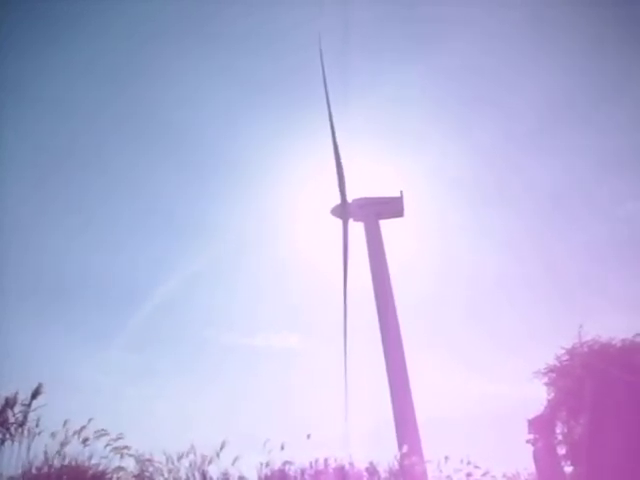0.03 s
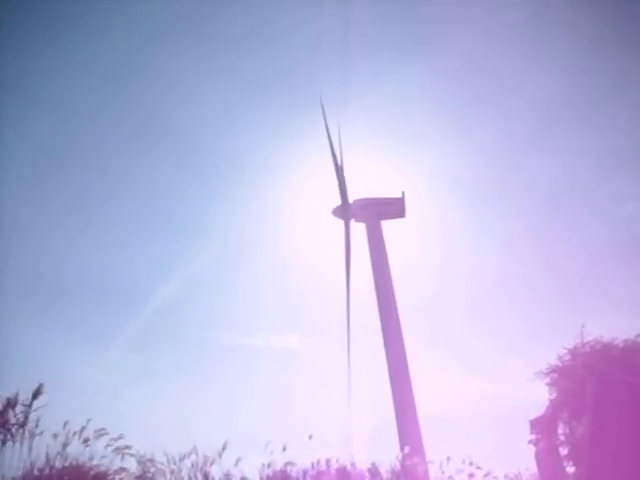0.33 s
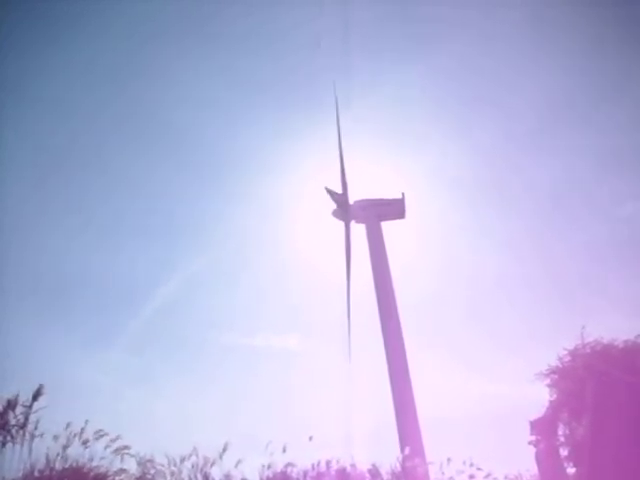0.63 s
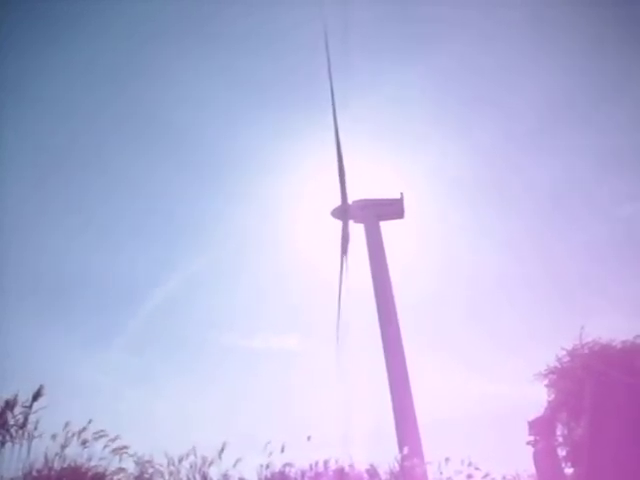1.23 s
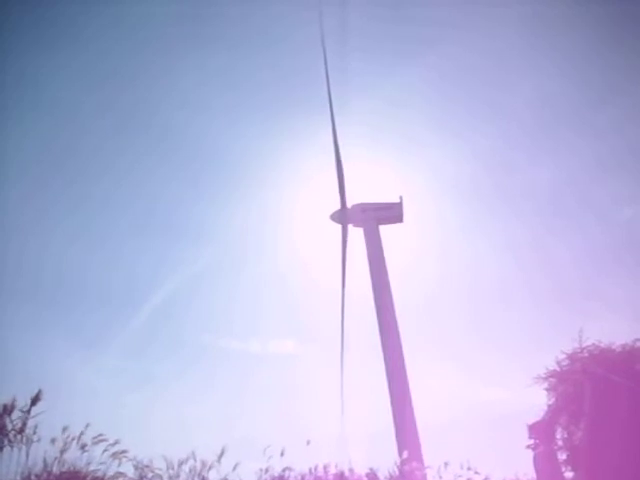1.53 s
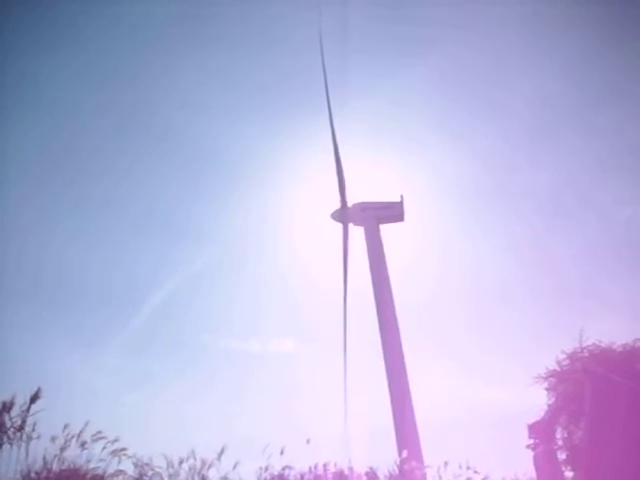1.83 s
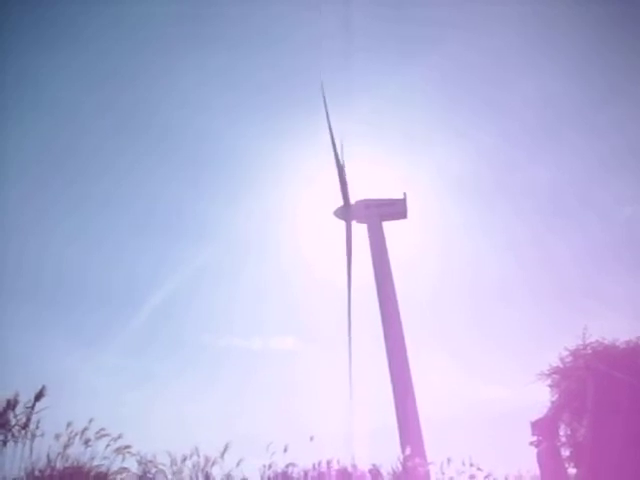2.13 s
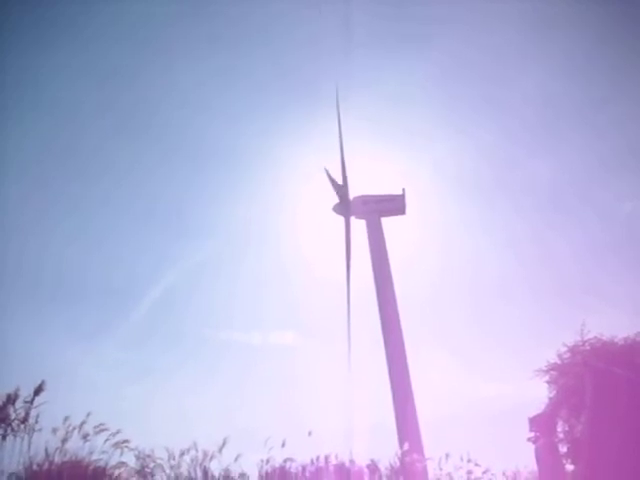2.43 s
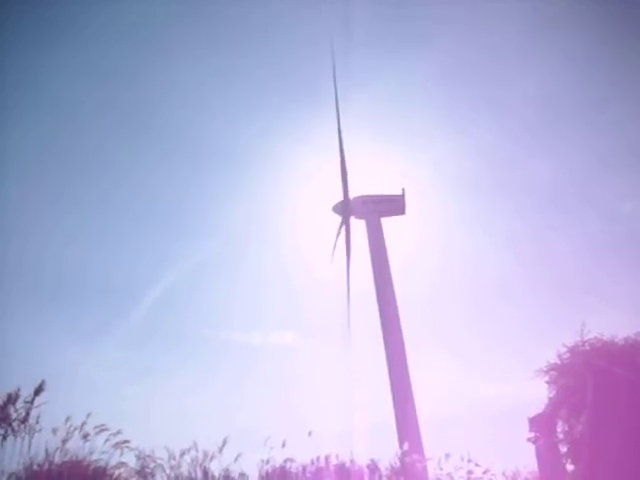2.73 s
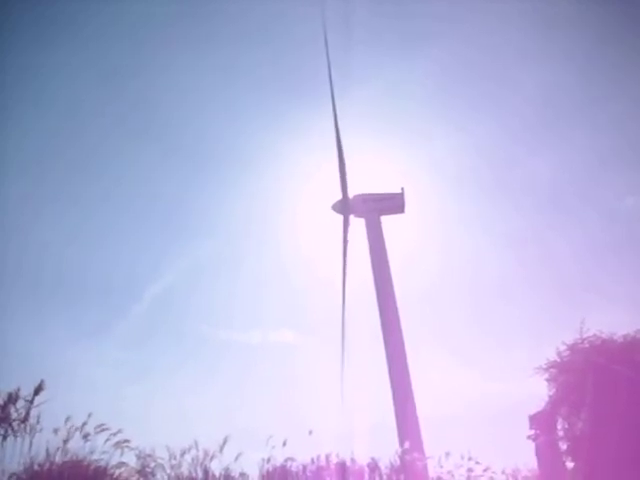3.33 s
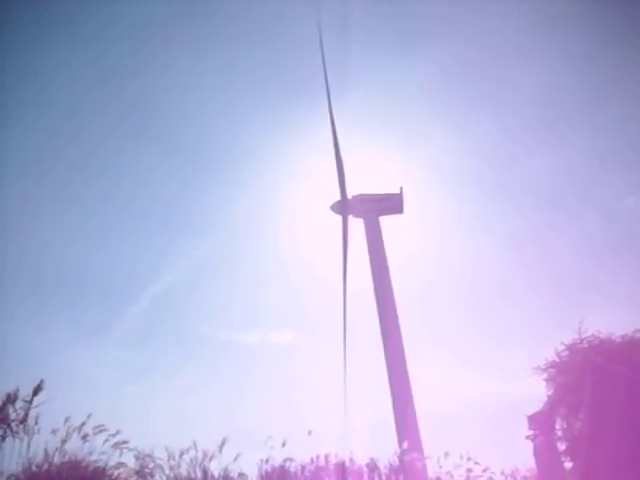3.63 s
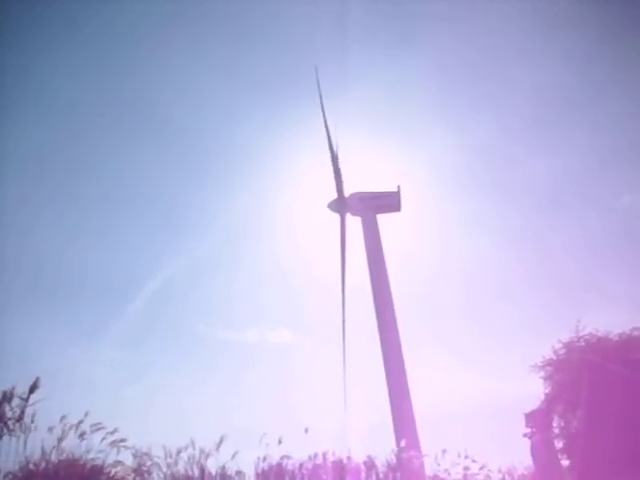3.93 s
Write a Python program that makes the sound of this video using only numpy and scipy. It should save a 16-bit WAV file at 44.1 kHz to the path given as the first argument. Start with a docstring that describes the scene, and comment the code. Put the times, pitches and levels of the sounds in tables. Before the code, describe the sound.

Steady low wind rumbles on a hand-held microphone in a field, under the even rush and faint hum of a wind turbine overhead. Light hiss runs throughout, with a few tiny ticks and soft handling bumps.

```python
"""A field below a wind turbine in a steady breeze, heard in mono on a small hand-held camera.
Wind rumbles and its eddies thump the microphone. Overhead, air rushes over the turning blades,
the gearbox hums faintly and the machinery drones through the tower.
Close up, the camera adds hiss, a faint buzz at its frame rate, tiny ticks and soft handling bumps.
One thin digital splice click, brighter than everything else, cuts in once."""
import sys
import numpy as np
from scipy.fft import rfft, irfft, next_fast_len
from scipy.io import wavfile
from scipy.ndimage import map_coordinates

SR = 44100
rng = np.random.default_rng(int(sys.argv[2]) if len(sys.argv) > 2 else 0)


def transcribe(u):
    """Save the signal u as a 16-bit wav file named by the first command-line argument.

    u: samples, shape (n,) or (channels, n), limited to [-1, 1]; the rate is SR.
    q: integer samples, one column per channel.
    """
    v = np.clip(np.atleast_2d(u).T, -1, 1)
    q = np.round(v * 32767).astype(np.int16)
    wavfile.write(sys.argv[1], SR, q)


N = 176400
TIME = np.arange(N) / SR


def amp(db):
    """Decibels to gain."""
    return 10 ** (np.asarray(db) / 20)


def unit(x):
    """Scale to rms 1."""
    return x / np.sqrt(np.mean(x ** 2) + 1e-20)


def curve(rows):
    """(time, value) points as one value per sample."""
    return np.interp(TIME, *np.transpose(rows))


def wobble(rate):
    """A smooth random curve, rate knots a second."""
    return map_coordinates(rng.standard_normal(400), [TIME * rate], mode="wrap")


def filtered(x, response):
    """Filter x by a response given as a function of frequency."""
    size = next_fast_len(N + SR // 2)
    return irfft(rfft(x, size) * response(np.fft.rfftfreq(size, 1 / SR)), size)[:N]


def noise(spectrum):
    """Noise of rms 1 coloured by (frequency, level) points."""
    hz, db = np.transpose(spectrum)
    colour = lambda f: amp(np.interp(np.log(f + 1), np.log(hz + 1), db))
    return unit(filtered(rng.standard_normal(N), colour))


# Hiss inside the camera (frequency [Hz], relative density [dB])
HISS_SPECTRUM = [(100, 1), (3150, -0.15), (3350, 1), (3470, 3), (3600, 1), (3750, 1.2), (4650, 0),
                 (5850, -2), (6500, -1), (7000, -9.5), (7400, -17), (7800, -37.5)]
# Electrical buzz inside the camera (frequency [Hz], relative density [dB])
BUZZ_SPECTRUM = [(300, -10.5), (1800, -2.5), (3250, -2.5), (3450, 1.5), (3750, -6.5), (4600, -7),
                 (5050, 0.5), (5500, -0.5), (5850, -5.5), (6500, -4.5), (7000, -12), (7800, -36)]
def electronics(hiss_db=-64.5, buzz_db=-65.5, frame_hz=29.92, first_burst_s=.0085, width_s=.0065):
    """Even hiss, and a short burst of fizz with every picture frame."""
    frames_from_burst = ((TIME - first_burst_s) * frame_hz + .5) % 1 - .5
    bursts = np.exp(-.5 * (frames_from_burst / frame_hz / width_s) ** 2)
    return amp(hiss_db) * noise(HISS_SPECTRUM) + amp(buzz_db) * bursts * noise(BUZZ_SPECTRUM)


def splice_click(at_s=1.4233, db=-35, decay_s=.0001):
    """One thin digital click: a sudden step that relaxes at once."""
    age = TIME - at_s
    return amp(db) * (age >= 0) * np.exp(-abs(age) / decay_s)


# Ticks at the camera, right by the microphone (time [s], level [dB], length [s])
CAMERA_TICKS = [(.0688, -40, .00016), (.2042, -36, .00028), (.6045, -38, .00022), (.971, -35, .0004),
                (1.6810, -35, .00033), (2.8144, -41, .0001), (3.813, -41.5, .0001)]
def ticks(cutoff_hz=6600):
    """Tiny dry ticks: square-edged blips, softened by the microphone."""
    blips = sum(amp(db) * ((TIME >= at) & (TIME < at + length)) for at, db, length in CAMERA_TICKS)
    return filtered(blips, lambda f: 1 / np.sqrt(1 + (f / cutoff_hz) ** 20))


# The hand on the camera body (time [s], push level [dB], contact width [s])
HANDLING_BUMPS = [(1.3477, -35, .00028), (1.9022, -26.8, .00016), (1.9041, -26, .00014),
                  (2.131, -31.5, .0002), (3.8362, -32, .0005)]
def handling(body_hz=348, body_width_hz=70, body_db=3.5):
    """Each bump is one push, duller for a longer contact; the camera body adds a short low ring."""
    pushes = -sum(amp(db) / np.cosh(np.clip((TIME - at) / width, -20, 20))
                  for at, db, width in HANDLING_BUMPS)
    body = lambda f: 1j * f * body_width_hz / (body_hz ** 2 - f ** 2 + 1j * f * body_width_hz)
    return filtered(pushes, lambda f: 1 + amp(body_db) * body(f))


# Single eddies right on the microphone (time [s], peak level [dB], pitch [Hz])
EDDY_THUMPS = [(.175, -37, 48), (.555, -35, 58), (.972, -33, 56), (1.82, -36, 42)]
def eddies():
    """An eddy thumps the microphone: pressure rises, swings into suction and settles."""
    swing = lambda u: -u * np.exp(.5 * (1 - u ** 2))
    return sum(amp(db) * swing(2 * np.pi * hz * (TIME - at)) for at, db, hz in EDDY_THUMPS)


# Wind down in the field: deep rumble, low roar above it (frequency [Hz], relative density [dB])
RUMBLE_SPECTRUM = [(4, -22), (12, -4), (22, -0.5), (45, 0), (60, -3.5), (78, -1), (95, -12), (130, -19),
                   (320, -38.5), (800, -73)]
ROAR_SPECTRUM = [(50, -27), (100, -6), (145, 0.5), (185, -4), (230, -12.5), (400, -28), (900, -63.5)]
# How each swells at the microphone (time [s], level [dB])
RUMBLE_SWELL = [(0, -43), (.2, -44.5), (.75, -46), (.97, -42.5), (1.1, -43.5), (1.649, -42), (2.05, -45.5),
                (2.3, -43.5), (2.9, -44.5), (3.4, -44.2), (3.75, -43), (4, -42.5)]
ROAR_SWELL = [(0, -47.5), (.38, -50), (.55, -54), (.9, -49), (1.1, -56), (1.75, -52), (1.9, -49.5),
              (2.25, -52), (2.4, -56.5), (2.9, -50), (3.4, -52.5), (4, -49.5)]
def wind(buffet_db=.75, buffets_per_s=9):
    """Deep rumble and a low roar, each swelling with the breeze and its eddies."""
    layers = [(RUMBLE_SPECTRUM, RUMBLE_SWELL), (ROAR_SPECTRUM, ROAR_SWELL)]
    return sum(noise(spectrum) * amp(curve(swell) + buffet_db * wobble(buffets_per_s))
               for spectrum, swell in layers)


# Tower and nacelle, heard from the ground (frequency [Hz], half-width [Hz], level [dB])
TOWER_RESONANCES = [(44.6, 4, -51.5), (510, 15, -58.5), (768, 12, -66), (878, 13, -66), (1062, 23, -70.5)]
def tower():
    """The machinery drones through narrow resonances of the structure."""
    drone = np.zeros(N)
    for hz, width, db in TOWER_RESONANCES:
        resonance = lambda f: 1 / (1 + ((f - hz) / width) ** 2)
        drone += amp(db) * unit(filtered(rng.standard_normal(N), resonance))
    return drone


# Gearbox tones from high overhead, faint at this distance (frequency [Hz], base level [dB])
GEAR_HUM = [(240, -68), (479.8, -61), (719.4, -64)]
# Their shared swell at the microphone (time [s], added level [dB])
HUM_SWELL = [(0, 2), (1.4, 2), (1.85, 6), (2.3, 1.5), (4, -1)]
def gearbox(speed_drift=.0028, fade_db=2.5):
    """Gear tones share one drifting shaft speed; each fades on its own on the way through the air."""
    relative_speed = 1 + speed_drift * wobble(rate=6)
    shaft_time = np.cumsum(relative_speed) / SR
    hum = np.zeros(N)
    for hz, db in GEAR_HUM:
        gain = amp(db + curve(HUM_SWELL) + fade_db * wobble(rate=9))
        hum += gain * np.sin(2 * np.pi * hz * shaft_time)
    return hum


# Air over the blades and the field, heard from below (frequency [Hz], relative density [dB])
RUSH_SPECTRUM = [(40, -3), (150, -1), (330, -0.3), (440, -3), (610, -4.5), (700, -4.5), (770, -6.5),
                 (900, -7.5), (1080, -10.5), (1270, -14.5), (2000, -20.5), (3000, -26.8), (7000, -56.5)]
# The rush as it reaches the microphone (time [s], level [dB])
RUSH_SWELL = [(0, -47.5), (1.28, -48.5), (1.35, -46.5), (1.43, -48.5), (1.9, -47.5), (2.4, -47.3),
              (3.2, -48), (4, -48)]
def blades(flutter_db=.51):
    """A broad rush of air with a slight turbulent flutter."""
    return noise(RUSH_SPECTRUM) * amp(curve(RUSH_SWELL) + flutter_db * wobble(rate=12))


def scene():
    """Wind and turbine with the camera's own small noises, in mono."""
    breeze = wind() + eddies()
    turbine = blades() + gearbox() + tower()
    camera = electronics() + ticks() + handling()
    return (breeze + turbine + camera)[None]


def record(dry, band_limit_hz=7850, click_limit_hz=16000):
    """The camera keeps nothing above its band limit; the splice click comes after and reaches higher."""
    sound = filtered(dry[0], lambda f: f < band_limit_hz) + splice_click()
    return filtered(sound, lambda f: f < click_limit_hz)[None]


dry = scene()
out = record(dry)
transcribe(out)
```